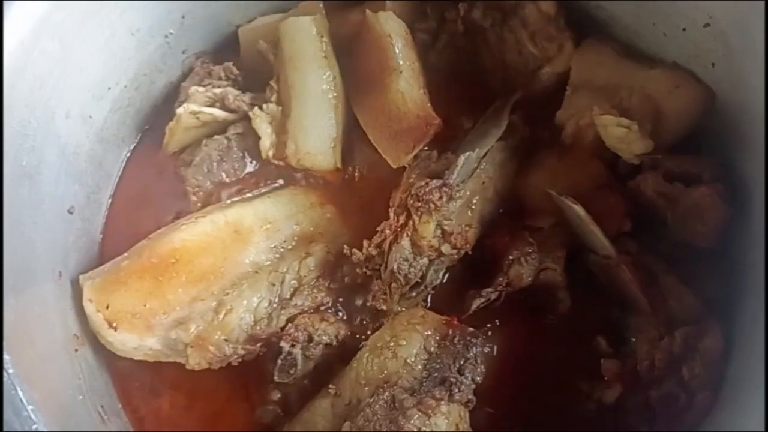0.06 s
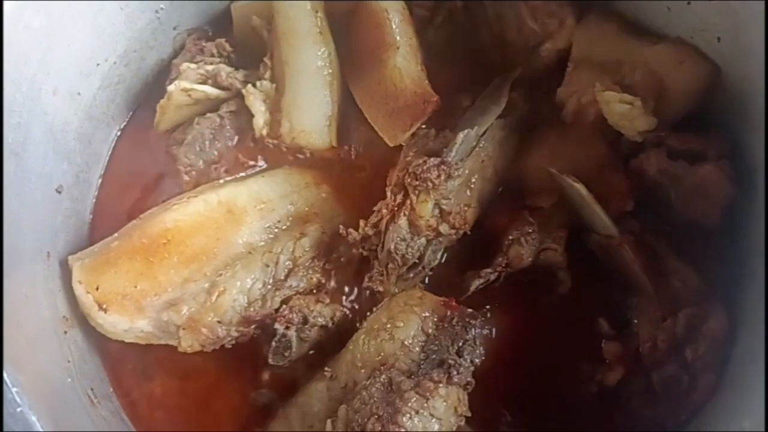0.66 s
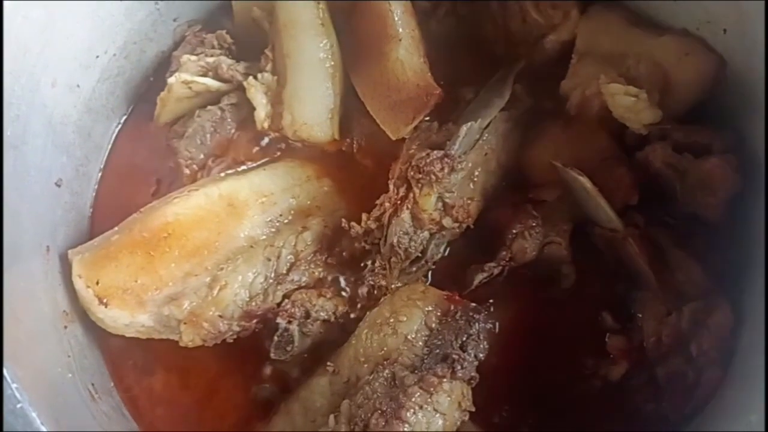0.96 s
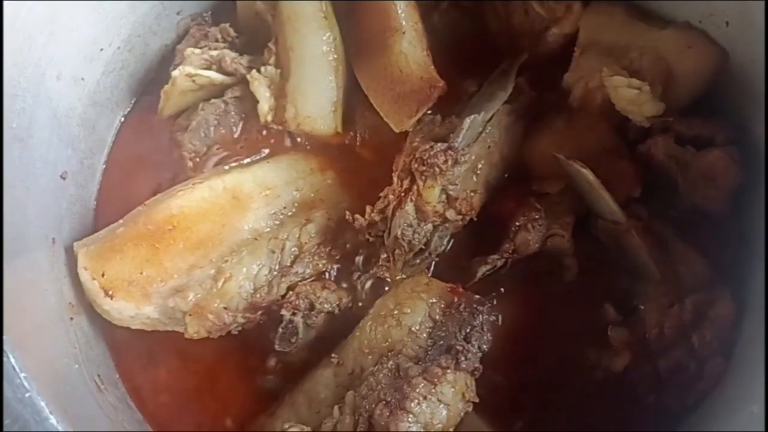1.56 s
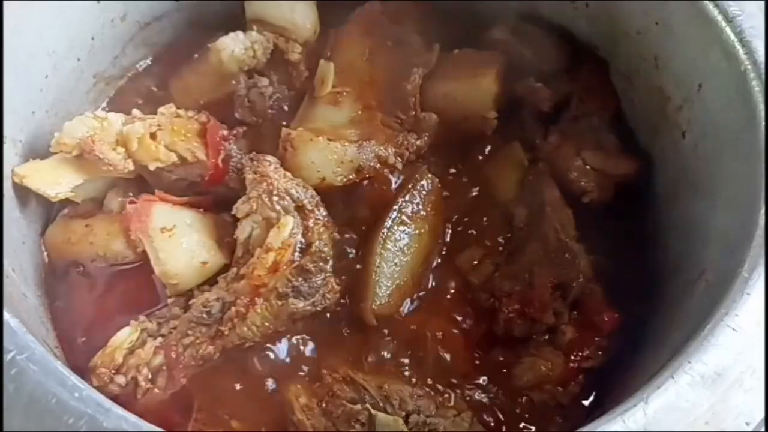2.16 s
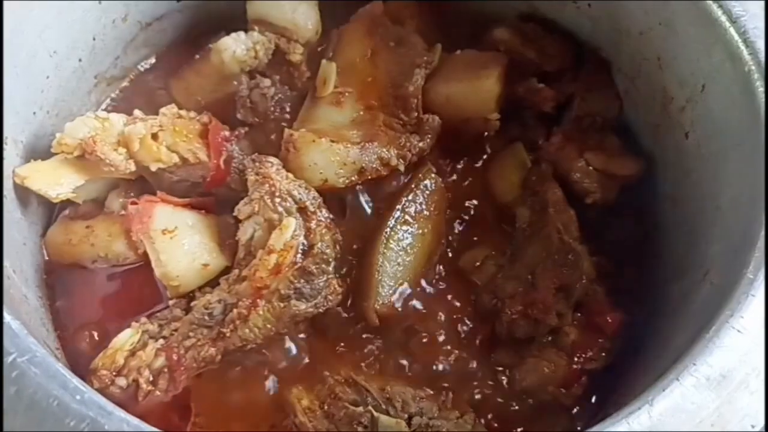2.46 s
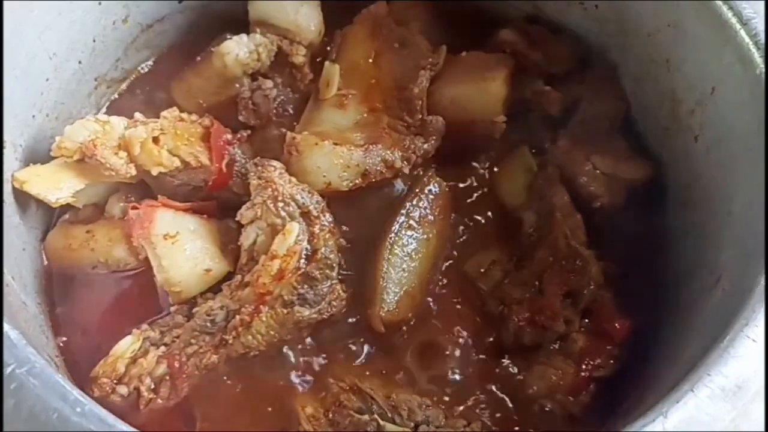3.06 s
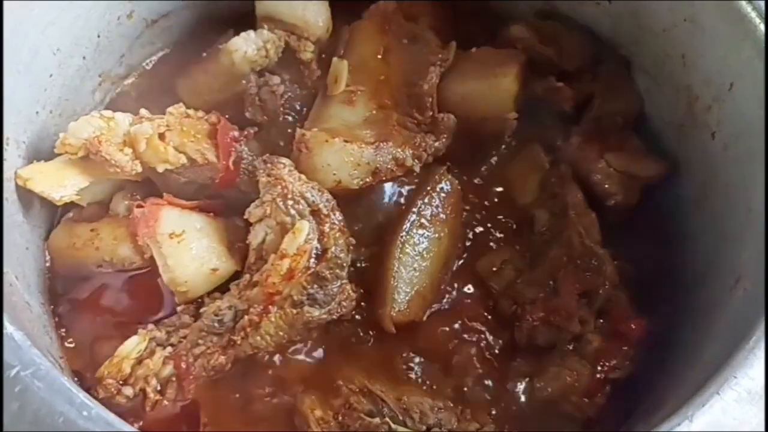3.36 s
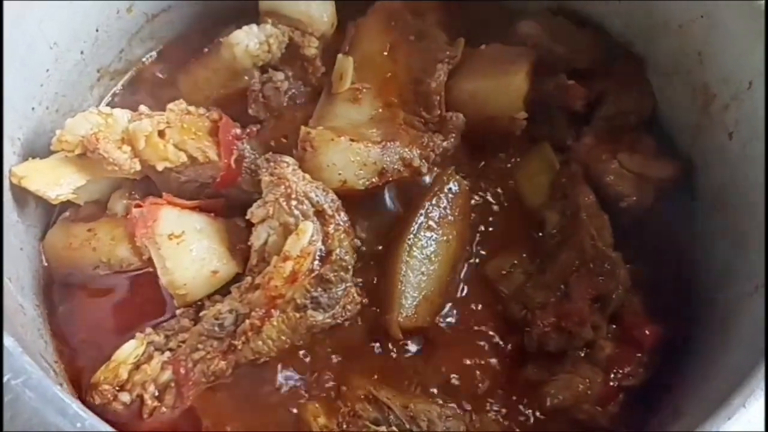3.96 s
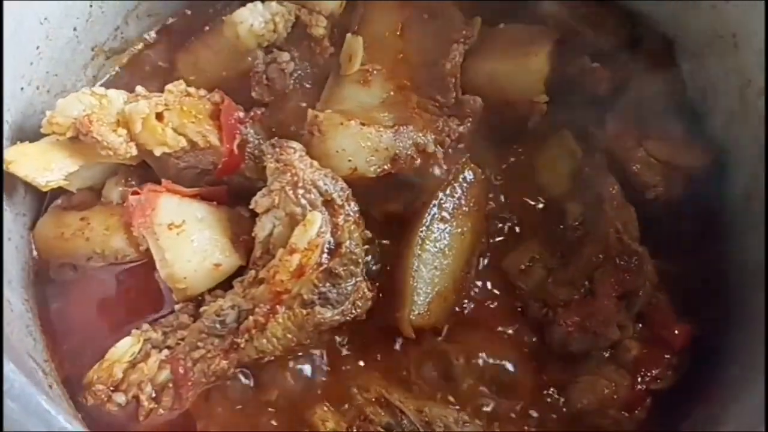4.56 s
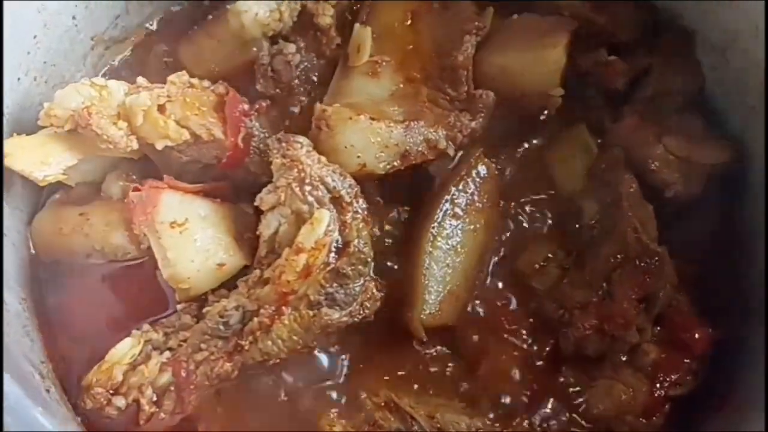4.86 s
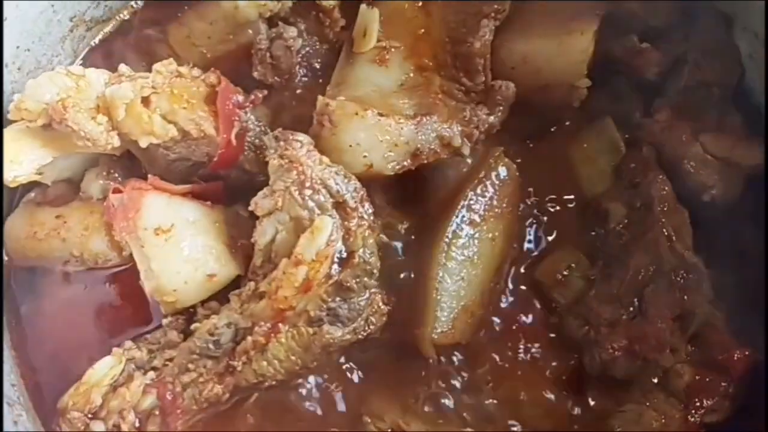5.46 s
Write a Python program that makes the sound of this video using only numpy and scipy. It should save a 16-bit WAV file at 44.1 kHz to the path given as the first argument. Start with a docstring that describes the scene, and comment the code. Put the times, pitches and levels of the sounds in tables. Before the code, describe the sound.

A bright, surging sizzle comes first from a metal pot of stew on a stove, dotted with soft glugs, ticks and spitting droplets. A little before halfway it stops suddenly and gives way to softer boiling, with thick bubbles popping unevenly, a slight hollow ring from the pot and faint fizzing splashes. The microphone is close above the pot throughout.

```python
"""On a stove, a metal pot of meat curry is heard from close above. First it hisses: liquid flashes to steam on
the hot metal over a low simmer. The sizzle stops abruptly; after a short silent gap the scene changes to a
quieter boil: thick bubbles plop, ring the pot's hollow and throw spray that fizzes away on the hot wall. Now
and then a droplet spits or a tiny bubble cracks open with a tick."""
import sys
import numpy as np
from scipy import signal
from scipy.fft import rfft, irfft, next_fast_len
from scipy.io import wavfile
from scipy.ndimage import uniform_filter1d, map_coordinates

SR = 44100
rng = np.random.default_rng(int(sys.argv[2]) if len(sys.argv) > 2 else 0)


def generate_wav(signal):
    """Clip the signal to [-1, 1] and save it as 16-bit WAV at the path in sys.argv[1]."""
    frames = np.transpose(np.atleast_2d(signal))
    scaled = np.clip(frames, -1, 1) * 32767
    pcm = np.round(scaled).astype(np.int16)
    wavfile.write(sys.argv[1], SR, pcm)


N = 251370  # 5.7 seconds

# Dull glugs and bumps under the sizzle. Each row: start in seconds, level in dB, pitch in Hz.
GLUGS = [(.245, -40, 590), (.28, -36.5, 600), (0.515, -34.5, 595), (1.236, -43, 95), (1.272, -34.5, 126),
         (1.273, -41.5, 230), (1.32, -35.5, 104), (1.351, -39.5, 99), (1.671, -47, 108),
         (1.807, -31.5, 1210)]
# Tiny bubbles cracking open. Each row: time in seconds, level in dB, pitch in Hz.
TINY_CRACKS = [(1.386, -15, 4200), (1.578, -29, 4000), (1.701, -14, 3800), (1.985, -17, 5200),
               (2.0927, -20, 3700), (2.9615, -40, 11800), (3.2013, -35, 5900), (3.257, -37, 3450),
               (3.6318, -34, 10500), (3.6655, -40, 12000), (4.2, -34, 9000), (4.4126, -40, 10500),
               (5.3766, -34, 9500)]
# Droplets spitting on the wall. Each row: time in seconds, level in dB, pitch of the ring in Hz,
# level of the rasp against the ring in dB.
DROPLETS = [(1.852, -29.5, 3500, -12), (1.938, -31.5, 3680, -5), (1.987, -29, 3530, -10),
            (2.089, -28, 3700, -14), (2.135, -28, 3550, -12), (2.209, -30, 3430, -12),
            (2.416, -26, 3500, -13), (2.478, -54, 2300, -18), (3.06, -55, 6000, -3),
            (3.244, -47, 3430, -19), (3.435, -47, 2500, -7), (4.279, -53, 2800, -6),
            (4.293, -44.5, 3300, -9), (4.303, -41.5, 2840, -11), (4.414, -57, 5900, -9),
            (5.067, -48, 2670, -2), (5.076, -40.5, 1930, -9), (5.097, -42.5, 3250, -7),
            (5.365, -51, 3460, 6), (5.376, -51, 3470, 6), (5.446, -43, 2520, -8), (5.578, -52.5, 2650, 3)]
# Narrow resonances of the pot's air and wall. Each row: pitch in Hz, width in Hz, strength from 0 to 1.
POT_RESONANCES = [(224, 48, 0.33), (419.4, 25, 0.86), (630, 99, 0.75), (716, 37, 0.7), (1075, 30, 0.62),
                  (2022, 54, 1), (2137, 93, 0.44), (2490, 20, 0.4), (3095, 37, 0.55), (3513, 54, 0.8),
                  (3745, 18, 0.73), (4320, 280, 0.22)]
# How the sizzle and the boil build up and hold. Each row: time in seconds, level in dB.
SIZZLE_LEVELS = [(.13, -49), (.155, -40.5), (.19, -36), (.23, -35.5), (.27, -31.2), (.45, -29.2),
                 (.66, -29.3), (.7, -30.2), (1.0, -29.7), (2.41, -29.5)]
BOIL_LEVELS = [(2.5, -58), (2.61, -48), (2.64, -44.5), (5.7, -46)]
# Tone colour of the sizzle and of the boiling pot. Each row: frequency in Hz, left and right gain in dB.
SIZZLE_COLOUR = [(29.7, -36, -25), (80.5, -20, -17), (250, -20.5, -22), (410, -16.5, -16),
                 (487, -20.5, -18.5), (634, -16.5, -18), (1030, -23, -25.5), (1290, -17, -15),
                 (1690, -17, -18.5), (1755, -10, -11), (4630, -6, -9.5), (4870, -10, -7), (5260, -3.5, -11),
                 (6360, -5.5, -14), (7420, -12, -14.5), (8600, -12.5, -12.5), (8880, -19.5, -13.5),
                 (11650, -16.5, -4.5), (11760, -15.5, 1), (15050, -13.5, -7)]
POT_COLOUR = [(29.8, -26.5, -33), (135.5, -3, -4), (220, 0, -0.5), (299, -5.5, -7), (363, -1, -0.5),
              (643, -3.5, -8.5), (965, -8.5, -12), (1165, -7, -10.5), (1620, -20, -13.5),
              (1940, -15, -13.5), (2000, -25, -15), (3000, -25.5, -25.5), (5000, -31, -32.5),
              (5750, -30.5, -25.5), (8350, -35, -34.5), (11500, -29, -34.5)]
# How alike left and right sound. Each row: frequency in Hz, likeness from 0 (unrelated) to 1 (the same).
SIZZLE_LIKENESS = [(60, 0.11), (400, 0.97), (1000, 0.074), (1500, 0.33), (2700, 0.014), (4500, 0.073),
                   (6500, 0.063), (12000, 0.089)]
POT_LIKENESS = [(50, 0.54), (140, 0.99), (700, 0.87), (1000, 0.089), (1200, 0.83), (1550, 0), (1950, 0.47),
                (2600, 0), (9000, 0.0094)]
# Liquid washes over the hot metal, so the sizzle surges or lulls.
# Each row: time in seconds, lift of the body in dB, lift of the treble in dB.
WASHES = [(0.22, -3, 0), (0.38, -5, 0.5), (0.54, 3.5, 2.5), (0.68, -5.5, -0.5), (0.945, -1, -2),
          (1.02, 1, 2.5), (1.245, 1, 2), (1.315, -0.5, -3.5), (1.365, 3, 0), (1.44, -1.5, -1),
          (1.485, 2, 0), (1.535, -3, -1.5), (1.575, 2.5, -3.5), (1.66, 2, -0.5), (1.915, -5, -2.5),
          (2.135, -1, -4), (2.19, 0, -2.5), (2.225, 2.5, 1.5), (2.3, 0.6, -1.5), (2.39, -3.5, -1)]
# Splashes that fizz away on the hot wall. Each row: start in seconds, level in dB.
WALL_SPLASHES = [(2.47, -64.5), (2.62, -52), (2.98, -65), (3.17, -60), (3.49, -55.5), (3.7, -56.5),
                 (4.481, -54.5), (4.7, -60.5), (5.1, -62), (5.34, -54), (5.419, -49), (5.64, -52)]
# Big bubbles bursting. Each row: time in seconds, level in dB, pitch in Hz,
# then the levels in dB of the low and the high tone that the snapping skin sounds.
BIG_BUBBLES = [(2.6455, -26.5, 610, -40, -46), (2.6658, -25, 560, -54, -49), (2.7603, -27, 527, -54, -60),
               (2.835, -39, 580, -35, -59), (2.8727, -37, 470, -41, -44), (2.9048, -31, 520, -37.5, -43),
               (2.9574, -31, 408, -58, -51), (2.9755, -40, 600, -49, -44), (2.9924, -32, 497, -41, -41),
               (3.0061, -27, 457, -52, -35.5), (3.1703, -29, 650, -54, -61), (3.192, -31, 420, -53, -53),
               (3.2015, -30.5, 560, -48, -56), (3.21, -22, 604, -49, -63), (3.3126, -29, 570, -39, -46),
               (3.345, -31, 480, -48, -52), (3.3824, -23, 675, -53, -46), (3.4283, -25.5, 487, -57, -55),
               (3.4916, -29.5, 590, -39, -49), (3.56, -22.5, 432, -58, -54), (3.5725, -28, 510, -52, -51),
               (3.6535, -36, 486, -43, -36.5), (3.6692, -24.5, 640, -46, -55), (3.7056, -23, 563, -44, -43),
               (3.7169, -36, 600, -43, -46), (3.8027, -35, 515, -40, -60), (3.8771, -24.5, 620, -39, -43),
               (3.9298, -38, 460, -37, -39.5), (3.9883, -28.5, 686, -41, -38.5),
               (4.0201, -51, 462, -52, -44), (4.0952, -25.5, 540, -51, -50), (4.104, -25, 483, -50, -54),
               (4.1119, -26, 595, -36, -56), (4.1671, -22.5, 590, -55, -42), (4.2094, -26, 526, -57, -42),
               (4.2196, -36, 410, -56, -49), (4.2662, -20.5, 580, -49, -37.5), (4.2932, -25, 550, -49, -36),
               (4.3545, -30, 540, -53, -62), (4.3732, -43, 600, -44, -48), (4.3936, -32, 472, -51, -58),
               (4.4336, -28.5, 670, -50, -61), (4.51, -28, 616, -46, -56), (4.5347, -25.5, 483, -39, -48),
               (4.5448, -22, 595, -47, -54), (4.5846, -35, 444, -48, -41), (4.6088, -23.5, 540, -47, -56),
               (4.6969, -36, 740, -34, -56), (4.7327, -28.5, 515, -45, -58), (4.7473, -25, 474, -50, -41),
               (4.7548, -29, 510, -48, -46), (4.8272, -38, 560, -42, -46), (4.845, -22, 560, -54, -46),
               (4.8735, -31, 550, -47, -52), (4.8865, -26, 584, -46, -58), (4.8991, -23.5, 453, -38, -45),
               (4.9389, -27, 610, -36, -38.5), (4.9883, -27, 515, -39, -55), (5.0282, -28.5, 580, -41, -42),
               (5.0522, -32, 620, -36, -49), (5.0682, -26, 457, -36, -38), (5.0735, -31, 418, -51, -34),
               (5.1439, -27, 476, -56, -60), (5.1688, -29, 554, -59, -58), (5.24, -24, 590, -37, -46),
               (5.2664, -27, 640, -39, -43.5), (5.3216, -33, 510, -55, -60),
               (5.3662, -46, 574, -36.5, -36.5), (5.4463, -22.5, 497, -53, -47),
               (5.4815, -27, 540, -37, -45), (5.4903, -23.5, 520, -31.5, -39), (5.5783, -48, 600, -53, -38),
               (5.6297, -31, 515, -52, -56), (5.6562, -48, 586, -35, -52)]

SKIN_TONES_HZ, SKIN_SCATTER = (1132, 1881), 0.071  # each tone strays by up to this share
SIZZLE_ON_S, SIZZLE_OFF_S, BOIL_ON_S = .127, 2.411, 2.455


def amp(db):
    """Turn decibels into a gain."""
    return 10 ** (np.asarray(db) / 20)


def unit(x):
    """Scale a sound to an average power of 1."""
    return x / np.sqrt(np.mean(x ** 2) + 1e-20)


def along(table, hz):
    """Read a frequency table's columns at hz, on a log scale."""
    known_hz, *columns = np.transpose(table)
    return np.array([np.interp(np.log(hz + 1), np.log(known_hz), column) for column in columns])


def curve(table):
    """Join (time, value) rows with straight lines."""
    return np.interp(np.arange(N) / SR, *np.transpose(table))


def wobble(rate):
    """A smooth random curve through rate points a second."""
    return map_coordinates(rng.standard_normal(int(N * rate / SR) + 4), [np.arange(N) * rate / SR])


def fade(start):
    """Rise from silence to 1 within 20 ms."""
    return np.clip((np.arange(N) / SR - start) / .02, 0, 1)


def swell(rise_s):
    """A loudness shape that builds to 1 in rise_s and then dies."""
    age = np.arange(SR // 12) / SR / rise_s
    return age * np.exp(1 - age)


def add(track, s, sound):
    """Mix a sound into a track at s seconds."""
    part = track[..., max(0, round(s * SR)):][..., :sound.shape[-1]]
    part += sound[..., :part.shape[-1]]


def filtered(x, response):
    """Multiply each frequency of x by response(hz)."""
    size = next_fast_len(N + SR // 2)
    return irfft(rfft(x, size) * response(np.fft.rfftfreq(size, 1 / SR)), size)[..., :N]


def lagged(x, lag_s):
    """Make the left side lag_s later than the right."""
    return filtered(x, lambda hz: np.exp(np.pi * 1j * hz * lag_s * np.array([[-1], [1]])))


def pair(x, likeness):
    """Mix two unrelated signals into left and right of a given likeness."""
    turn = lambda hz: np.arccos(np.clip(along(likeness, hz)[0], -1, 1)) / 2
    mid, side = filtered(x, lambda hz: np.array([np.cos(turn(hz)), np.sin(turn(hz))]))
    return np.array([mid + side, mid - side])


def resonate(x, colour, lo_hz, hi_hz, size=4096):
    """Ring a stereo sound through one band of a tone colour."""
    hz = np.fft.rfftfreq(size, 1 / SR)
    band = 1 / np.sqrt((1 + (lo_hz / (hz + 1)) ** 8) * (1 + (hz / hi_hz) ** 8))
    cepstrum = irfft(np.log(amp(along(colour, hz)) * band + 1e-6))
    # Folding onto the first half makes the ring follow its cause, never lead it.
    cepstrum[:, 1:size // 2] *= 2
    cepstrum[:, size // 2 + 1:] = 0
    ring = irfft(np.exp(rfft(cepstrum)))
    return signal.fftconvolve(x, unit(ring) / np.sqrt(size), axes=1)[:, :N]


def pot_ring(x):
    """The pot's narrow resonances ring on after whatever sounds inside it."""
    peaks = lambda hz: sum(strength * 1j * hz * width / (pitch ** 2 - hz ** 2 + 1j * hz * width)
                           for pitch, width, strength in POT_RESONANCES)
    return filtered(x, lambda hz: 1 + peaks(hz))


def bursts(rate, spread_db, rise_s, rush):
    """Tiny noise bursts, about rate a second, over a steady hiss with rush times their power."""
    happens = rng.random(N) < rate / SR
    size = np.clip(rng.standard_normal(N), -2, 2)
    energy = happens * amp(spread_db * size) ** 2
    power = np.abs(signal.fftconvolve(energy, swell(rise_s) ** 2)[:N])
    return unit(rng.standard_normal((2, N)) * np.sqrt(power / power.mean() + rush))


def bubble(hz, cycles, rise):
    """One bubble's quickly dying tone; its pitch climbs as it opens."""
    turns = hz * np.arange(SR // 12) / SR
    phase = turns + rise * turns ** 2 / (turns + 10)
    tone = np.sin(2 * np.pi * phase) * turns * np.exp(-2 * turns / cycles)
    return tone / np.abs(tone).max()


def swarm(rate, hz, octaves, cycles, rise, pan_db, samples, spread_db=7):
    """Small bubbles at random times, rate a second, each a dying, rising tone within octaves of hz."""
    when, pitch, strength, side, phase = rng.random((int(rate * N / SR), 5)).T[:, :, None]
    turns = hz * 2 ** (octaves * (2 * pitch - 1)) * np.arange(samples) / SR
    shape = turns * np.exp(-2 * turns / cycles) * np.linspace(1, 0, samples)
    climb = rise * turns ** 2 / (turns + 4 * cycles)
    tones = amp(spread_db * strength ** 3) * shape * np.sin(2 * np.pi * (phase + turns + climb))
    places = ((when * N).astype(int) + np.arange(samples)).ravel()
    sides = [(tones * amp(sign * pan_db * side)).ravel() for sign in (-1, 1)]
    return unit(np.array([np.bincount(places, sound, N)[:N] for sound in sides]))


def simmer():
    """The liquid murmurs under the sizzle, with faint bubble blips."""
    liquid = pair(bursts(rate=310, spread_db=3.5, rise_s=.0033, rush=7.7), SIZZLE_LIKENESS)
    murmur = resonate(liquid, SIZZLE_COLOUR, lo_hz=35, hi_hz=1160)
    blips = swarm(rate=45, hz=700, octaves=1.1, cycles=6, rise=.11, pan_db=5, samples=2000)
    return amp(-51) * murmur + amp(-58) * blips


def glugs():
    """Dull glugs and bumps, stronger on the right."""
    out = np.zeros(N)
    for s, db, hz in GLUGS:
        add(out, s, amp(db) * bubble(hz, cycles=1.27, rise=.084))
    return out * amp([[-5], [2]])


def ticks(rise_s=.0007):
    """Tiny bubbles crack open, each a flick of noise around its own pitch."""
    out = np.zeros((2, N))
    shape = swell(rise_s)
    for s, db, hz in TINY_CRACKS:
        noise = rng.standard_normal((2, len(shape)))
        crack = shape * signal.lfilter(*signal.iirpeak(hz, Q=3, fs=SR), noise)
        add(out, s - rise_s, amp(db - 1) * crack / np.abs(crack).max())
    return out


def spits(rise_s=.0033):
    """Droplets flash to steam on the hot wall: a short rasp with a narrow ring."""
    out = np.zeros((2, N))
    shape = swell(rise_s)
    for s, db, hz, rasp_db in DROPLETS:
        steam = rng.standard_normal((2, len(shape)))
        ring = signal.lfilter(*signal.iirpeak(hz, Q=16, fs=SR), steam)
        rasp = signal.lfilter(*signal.butter(2, [1800, 8100], "bandpass", fs=SR), steam)
        add(out, s - rise_s, amp(db) * shape * (unit(ring) + amp(rasp_db) * unit(rasp)))
    return out


def spray(rise_s=.023, fade_db_per_s=78):
    """Flickering spray fizzes along with the boil; splashes flare up and boil away on the hot wall."""
    power = amp(curve(BOIL_LEVELS) - 16 + 2.5 * wobble(25)) ** 2
    for s, db in WALL_SPLASHES:
        age = np.maximum(np.arange(N) / SR - s, 0)
        flare = np.minimum(age / rise_s, 1)
        power += (flare * amp(db - fade_db_per_s * np.maximum(age - rise_s, 0))) ** 2
    drops = pair(bursts(rate=340, spread_db=2.8, rise_s=.0008, rush=1.3), POT_LIKENESS)
    hiss = resonate(drops, POT_COLOUR, lo_hz=2100, hi_hz=16000)
    fizz = swarm(rate=220, hz=3995, octaves=.8, cycles=16, rise=.036, pan_db=9, samples=600)
    crackle = swarm(rate=70, hz=4200, octaves=.7, cycles=4, rise=.02, pan_db=5, samples=300, spread_db=9)
    return np.sqrt(power) * (amp(8.5) * hiss + amp(-5) * fizz + amp(-8.5) * crackle)


def churn():
    """Small bubbles burble and blip all over the surface, swelling at random."""
    level = amp(curve(BOIL_LEVELS) + 1.52 * wobble(22))
    bubbling = pair(bursts(rate=250, spread_db=0, rise_s=.00088, rush=.22), POT_LIKENESS)
    body = resonate(bubbling, POT_COLOUR, lo_hz=44.2, hi_hz=2550)
    burble = swarm(rate=80, hz=719, octaves=1.08, cycles=3.2, rise=.044, pan_db=0, samples=1500,
                   spread_db=6.5)
    blips = swarm(rate=40, hz=1495, octaves=.562, cycles=7.2, rise=.088, pan_db=8, samples=1200)
    return level * (amp(.2) * body + amp(-8) * burble + amp(-13.5) * blips)


def lesser_bubbles(count=30, start_s=2.7, per_s=9.2):
    """Rows like BIG_BUBBLES for quieter bubbles that burst at an uneven pace."""
    when = start_s + (np.arange(count) + rng.random(count)) / per_s
    size, pitch, low, high = np.clip(rng.standard_normal((count, 4)), -2, 2).T
    hz = 535 * 2 ** (.076 * pitch)
    return np.transpose([when, -38 + size, hz, -58.5 - 3 * low, -58.5 - 3 * high])


def push(hz):
    """A push of air: one pressure spike between two dips, one period after its start."""
    phase = np.pi * (hz * np.arange(SR // 100) / SR - 1)
    return (1 - 2 * phase ** 2) * np.exp(-phase ** 2)


def pops():
    """Thick bubbles burst with a push of air and a plop; their snapping skin sounds two pot tones."""
    tone = np.zeros((2, N))
    puff, snap = np.zeros((2, N))
    for s, db, hz, low_db, high_db in np.vstack([BIG_BUBBLES, lesser_bubbles()]):
        lead, pitch, side = rng.random(3)
        low_hz, high_hz = np.array(SKIN_TONES_HZ) * (1 + SKIN_SCATTER * rng.uniform(-1, 1, 2))
        gain = amp(db + 3.2 * side * np.array([[1], [-1]]))  # leans left
        # Two smaller bubbles go just ahead.
        first = bubble(hz * (.67 + .89 * pitch), cycles=1.5, rise=.09)
        second = bubble(hz * .796, cycles=1.8, rise=.073)
        add(tone, s - .002 - .00495 * lead, gain * amp(-15) * first)
        add(tone, s - .004 - .00407 * pitch, gain * amp(-15.5) * second)
        # The burst plops and puffs into the pot's hollow.
        add(tone, s - 1 / hz, gain * amp(-4.2) * push(hz))
        add(tone, s - .98 / hz, gain * amp(-14.5) * bubble(hz, cycles=1.3, rise=.45))
        add(puff, s - .004, amp(db - 19.5) * swell(rise_s=.0041))
        # The skin snaps: low tone to the left, high tone to the right.
        add(tone, s - 1 / high_hz, amp(high_db + 3.5) * push(high_hz))
        add(tone, s - .0025, amp(low_db) * amp([[4], [1]]) * bubble(low_hz, cycles=3.56, rise=.015))
        add(tone, s - .0022, amp(high_db) * amp([[-1], [3]]) * bubble(high_hz, cycles=8, rise=.025))
        add(snap, s - .006, amp(high_db - 9) * swell(rise_s=.0085))
    air = pair(puff * rng.standard_normal((2, N)), POT_LIKENESS)
    crack = pair(snap * rng.standard_normal((2, N)), POT_LIKENESS)
    hollow = resonate(air, POT_COLOUR, lo_hz=92, hi_hz=1250)
    skin = resonate(crack, POT_COLOUR, lo_hz=1340, hi_hz=7050)
    return tone + hollow + skin


def patchy(x, depth_db, hi_hz):
    """Narrow patches of the sound flare and fade at random, mostly below hi_hz."""
    hz, _, spectrum = signal.stft(x, SR, nperseg=1024)
    patches = rng.standard_normal(spectrum.shape[1:])
    for axis in (0, 1):  # smooth over pitch, then over time
        patches = uniform_filter1d(patches, size=4, axis=axis)
    gain = amp(depth_db * unit(patches) / (1 + (hz[:, None] / hi_hz) ** 2))
    return signal.istft(spectrum * gain, nperseg=1024)[1][:, :N]


def surging(x, width_s=.015, split_hz=6500, growth_db_per_s=.65):
    """Liquid washing over hot metal lifts or lowers the body and the treble; the body slowly grows."""
    t = np.arange(N) / SR
    body_db, treble_db = sum(np.outer(lifts, np.exp(-((t - s) / width_s) ** 2 / 2))
                             for s, *lifts in WASHES)
    body = filtered(x, lambda hz: 1 / (1 + (hz / split_hz) ** 8))
    treble = x - body
    return body * amp(body_db - 2 + growth_db_per_s * t) + treble * amp(treble_db + .7)


def sizzle():
    """Liquid flashes to steam in bursts that merge into a sputtering hiss with tiny squeaks."""
    steam = pair(bursts(rate=1800, spread_db=2.3, rise_s=.0004, rush=1.8), SIZZLE_LIKENESS)
    squeaks = swarm(rate=600, hz=3700, octaves=.95, cycles=54, rise=.003, pan_db=6, samples=1500)
    shared_flutter_db = .15 * wobble(60) + .78 * wobble(30)
    side_flutter_db = .78 * np.array([wobble(30), wobble(30)])
    pockets = patchy(steam + .3 * squeaks, depth_db=2.1, hi_hz=7500)
    hiss = resonate(pockets, SIZZLE_COLOUR, lo_hz=1065, hi_hz=15700)
    sputter = unit(amp(shared_flutter_db + side_flutter_db) * hiss)
    return pot_ring(amp(curve(SIZZLE_LEVELS) + 4.4) * surging(sputter))


def scene():
    """The sizzle from the right stops; after a short gap the scene changes to a quieter boil from slightly
    left."""
    boil = lagged(spray() + churn() + pops(), lag_s=-.00014) * fade(BOIL_ON_S)
    hiss = lagged(sizzle() + simmer(), lag_s=.0003246) * fade(SIZZLE_ON_S)
    before_gap = 1 - fade(SIZZLE_OFF_S)
    # A short tail as the hiss cuts off.
    tail = amp(-26 - 700 * np.maximum(np.arange(N) / SR - SIZZLE_OFF_S - .01, 0))
    pot = pot_ring(boil + spits()) * (before_gap + fade(BOIL_ON_S))
    return hiss * np.maximum(before_gap, tail) + pot + ticks() + glugs()


def record(dry, bass_hz=38, top_hz=14380):
    """The deepest bass is thinned, and the microphone keeps nothing above top_hz."""
    thin = signal.lfilter(*signal.butter(2, bass_hz, "highpass", fs=SR), dry)
    return filtered(thin, lambda hz: np.clip((top_hz - hz) / 200, 0, 1))


dry = scene()
out = record(dry)
generate_wav(out)
```